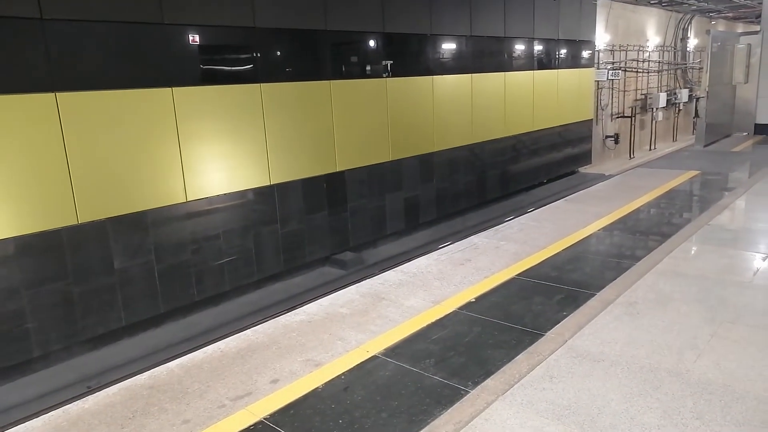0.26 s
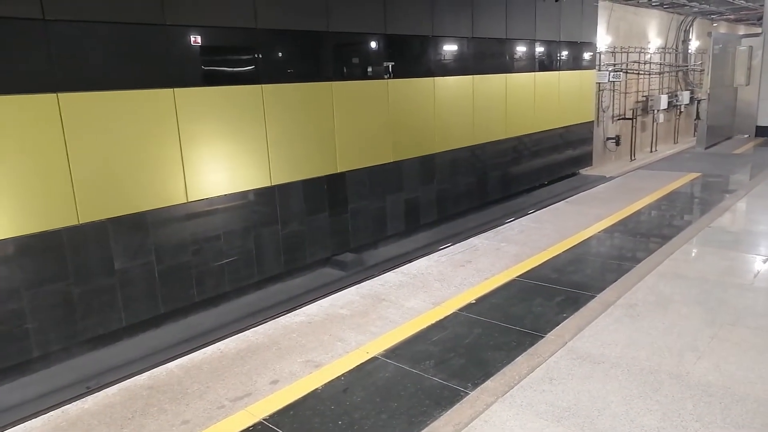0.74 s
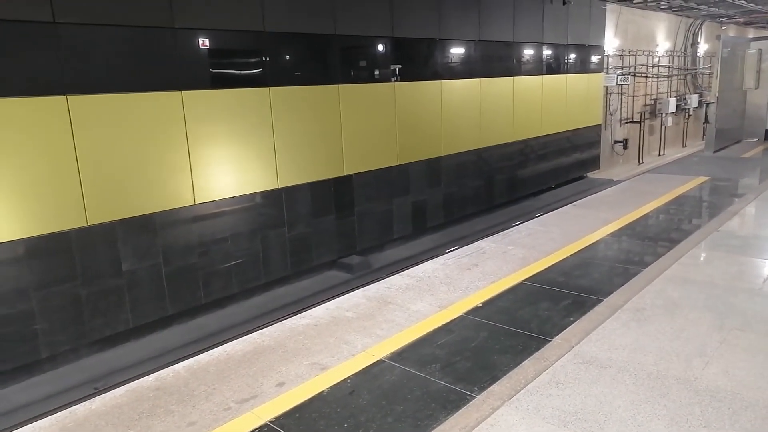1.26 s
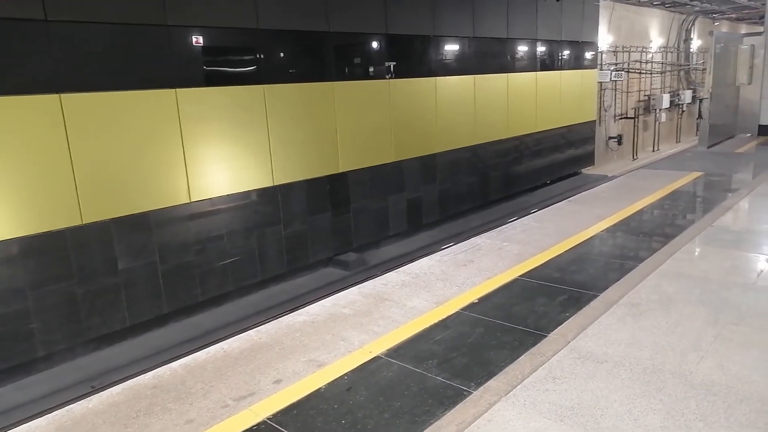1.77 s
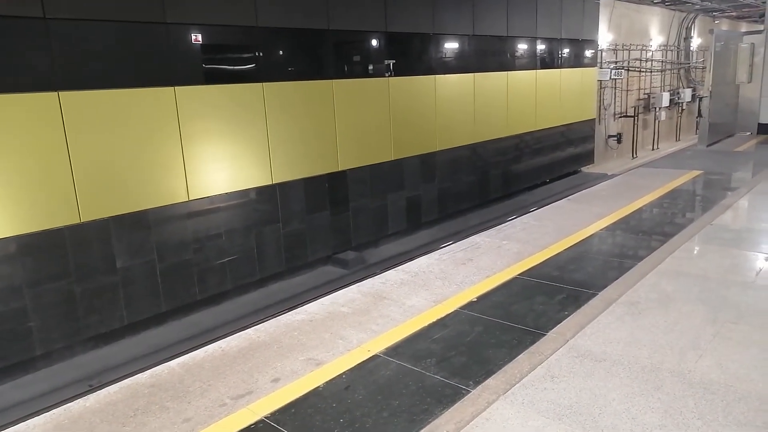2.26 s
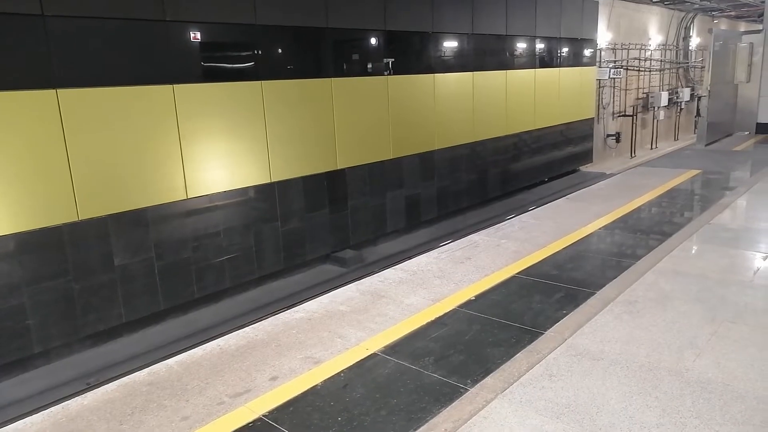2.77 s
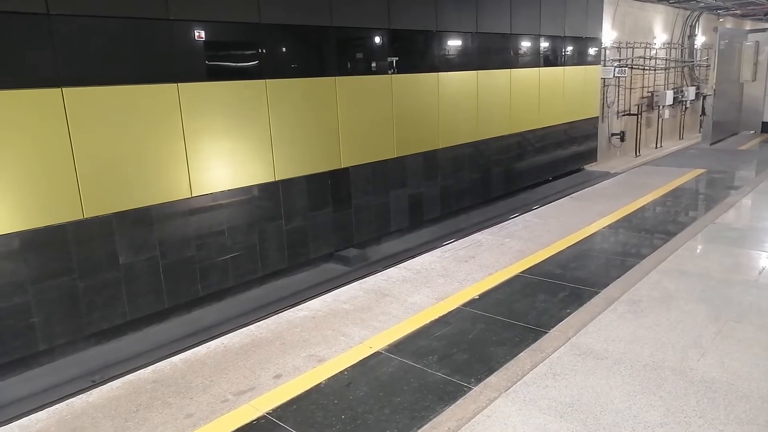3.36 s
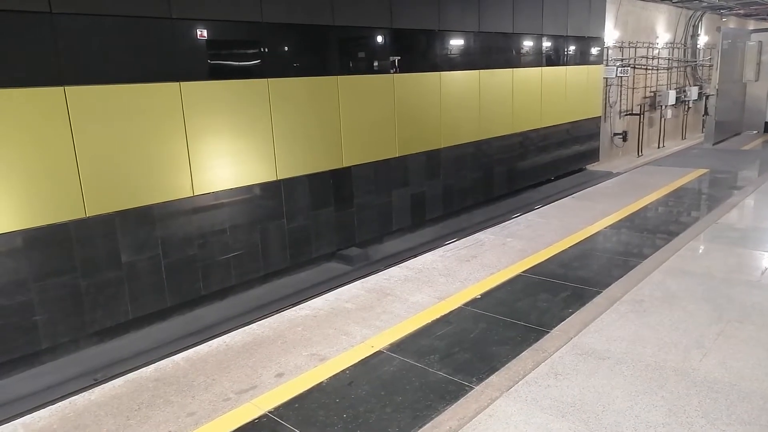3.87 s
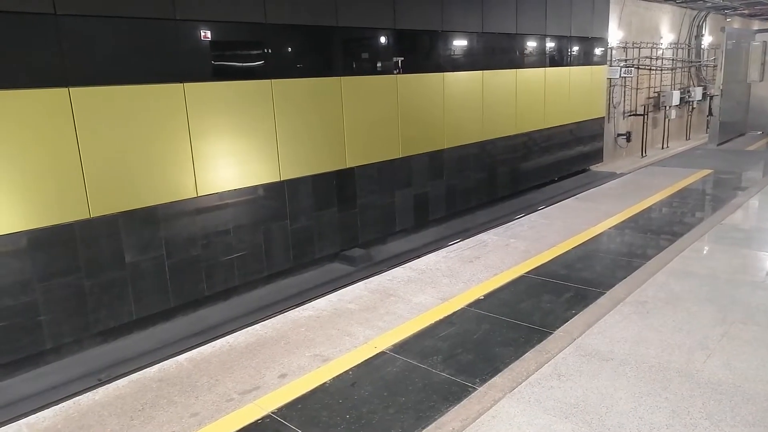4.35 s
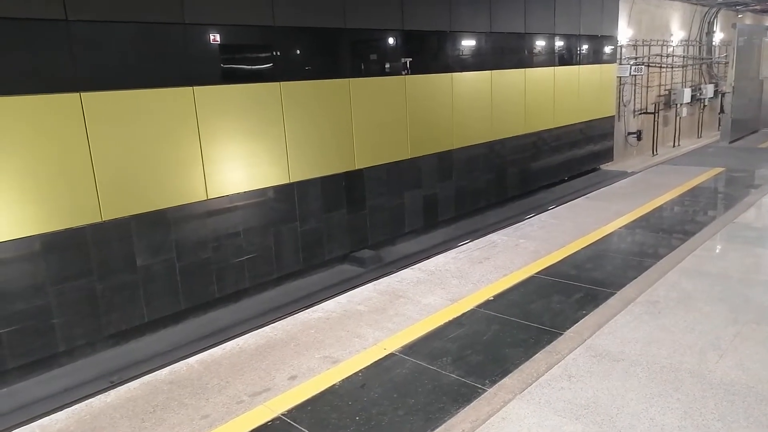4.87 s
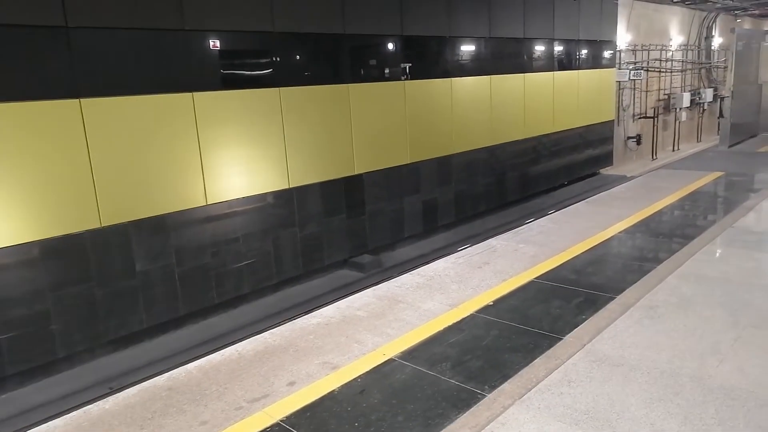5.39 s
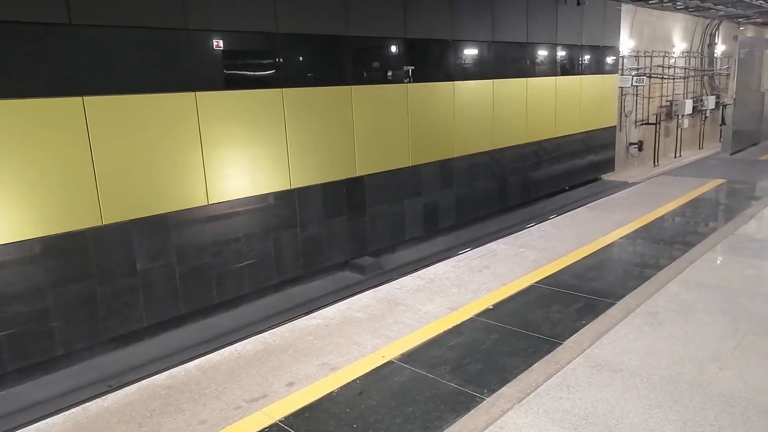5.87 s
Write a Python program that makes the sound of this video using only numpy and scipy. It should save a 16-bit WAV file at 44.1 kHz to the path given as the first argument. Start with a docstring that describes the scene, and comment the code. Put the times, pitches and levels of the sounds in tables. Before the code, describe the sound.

Empty metro platform, handheld stereo microphone. A far train fills the tunnel with a deep, uneven boom with brief hollow tones, and its soft wheel roar gradually grows. Draught thumps the microphone in short pops early on and again near the end. Quiet cloth rustles and tiny finger ticks sit close by, sharpest around three seconds, over a faint even hiss of moving air.

```python
"""An empty metro platform: a train still deep in the tunnel booms in the tube, whose standing waves swell
and sink, while its wheel roar slowly grows; all this is shaped noise, with a few drifting tones.
The draught that it pushes ahead thumps on the two microphone ports as short pops over a low flutter.
Close by, a sleeve rustles in strokes of grainy noise, and fingers tick and ring on the hand-held camera.
Behind it all, moving air hisses through the hall."""
import sys
import numpy as np
from scipy.fft import rfft, irfft, next_fast_len
from scipy.io import wavfile
from scipy.ndimage import uniform_filter1d, map_coordinates

SR = 44100
rng = np.random.default_rng(int(sys.argv[2]) if len(sys.argv) > 2 else 0)


def master_out(mix):
    """Clip the mix to full scale and print it as 16-bit PCM to the path in sys.argv[1]."""
    frames = np.transpose(np.atleast_2d(mix))
    ceiling = np.clip(frames, -1, 1)
    pcm = np.round(ceiling * 32767).astype(np.int16)
    wavfile.write(sys.argv[1], SR, pcm)


N = 270052

# Eddies that pop on the ports.
# Each row: time in seconds, relative level in dB, pitch in Hz, left over right in dB.
EDDY_POPS = [(0.534, -11, 170, -19), (.545, -20, 472, -26), (.553, -18.5, 465, -24),
             (.577, -21.5, 424, -27), (.585, -21, 468, -27), (.591, -27, 546, -29.5),
             (.670, -9.5, 202, -24), (.673, -21.5, 720, -31), (.678, -18, 500, -30), (.690, -23, 593, -24),
             (.695, -24.5, 343, -4), (.704, -24, 565, -27), (.715, -20.5, 477, -17.5),
             (.725, -16, 498, 17.5), (.738, -13.5, 390, 25.5), (.749, -24, 566, 20), (.774, -35, 546, 14.5),
             (1.099, -24.5, 470, 2), (1.107, -9, 160, 20.5), (1.121, -22.5, 428, 19),
             (1.136, -23, 476, -24), (1.169, -21, 420, 18), (1.194, -27, 517, -13.5), (1.201, -15, 503, 21),
             (1.214, -31, 557, 7), (1.234, -23.5, 577, 17), (1.254, -15.5, 138, -23.5),
             (1.279, -12.5, 85, 11), (1.347, -21, 128, 15), (5.801, -20.5, 830, 32), (5.804, -8, 560, 26),
             (5.811, -22, 580, 25), (5.824, -19, 69, 16), (5.828, -5.5, 187, 18), (5.886, -21, 400, 24),
             (5.928, -15, 150, 26), (5.933, -21.5, 583, 20.5), (5.946, -14, 218, 22), (5.959, -12, 276, 31),
             (6.079, -10, 244, 17), (6.082, -18.5, 553, 28), (6.084, -31, 1020, 29), (6.093, -22, 520, 26),
             (6.102, -26, 580, 24)]


def amp(db):
    """Decibels to gain."""
    return 10 ** (np.asarray(db) / 20)


def unit(x):
    """Scale to rms 1."""
    return x / np.sqrt(np.mean(x ** 2) + 1e-20)


def along(points, hz):
    """Read a curve of (Hz, value) points on a log frequency axis."""
    f, v = np.transpose(points)
    return np.interp(np.log(hz + 1), np.log(f + 1), v)


def clock():
    """The time of each sample in seconds."""
    return np.arange(N) / SR


def curves(rows):
    """One value per sample for each column after the time."""
    s, *cols = np.transpose(rows)
    return [np.interp(clock(), s, c) for c in cols]


def wobble(rate):
    """A smooth random curve with rate knots a second."""
    knots = rng.standard_normal(int(N * rate / SR) + 4)
    return map_coordinates(knots, [np.arange(N) * rate / SR])


def filtered(x, response):
    """x times a response of frequency."""
    m = next_fast_len(N + SR // 2)
    return irfft(rfft(x, m) * response(np.fft.rfftfreq(m, 1 / SR)), m)[..., :N]


def pan(lean_db):
    """Left and right gains of constant power; a positive lean is louder on the left."""
    pair = amp(np.array([lean_db, -lean_db]).reshape(2, -1) / 2)
    return pair / np.sqrt(np.mean(pair ** 2, axis=0))


def band(centre_hz, width_hz):
    """Noise of rms 1 in one resonance, whose centre may move."""
    slow = filtered(rng.standard_normal((2, N)), lambda hz: 1 / (1 + (hz / width_hz) ** 2))
    phase = 2 * np.pi * np.cumsum(centre_hz * np.ones(N)) / SR
    return unit(slow[0] * np.cos(phase) + slow[1] * np.sin(phase))


def ripple(hz, depth_db):
    """Uneven gain over frequency from many close reflections."""
    uneven = map_coordinates(rng.standard_normal(SR // 40), [hz / 35], order=1)
    return amp(depth_db * uneven * np.clip(hz / 1500, 0, 1))  # full depth above 1500 Hz


def stroke(s, length):
    """One swell: it builds to 1 at time s and dies away more slowly."""
    release_ratio, shape = 2.13, 1.4
    u = (clock() - s) / length
    return np.exp(-np.maximum(-u, u / release_ratio) ** shape)


def hall(colour, ripple_db=1.73):
    """Diffuse noise of rms 1: alike at both ports only for long waves, mostly stronger on the tunnel's side."""
    # The tunnel lies to the right. Each row: frequency in Hz, left over right in dB.
    side_lean = [(40, -2.5), (110, -0.5), (200, -6), (380, -2), (700, -3.5), (1300, -2.5), (2400, -5.5),
                 (4400, -13), (9000, 1)]
    port_gap_m, sound_speed_m_s = 0.18, 343

    def spread(hz):
        """Shares of mid and side that give the coherence of a diffuse field."""
        alike = 0.96 * np.sinc(2 * hz * port_gap_m / sound_speed_m_s)
        turn = np.arccos(np.clip(alike, -1, 1)) / 2
        return np.array([np.cos(turn), np.sin(turn)])

    mid, side = filtered(rng.standard_normal((2, N)), lambda hz: colour(hz) * spread(hz))
    both = np.array([mid + side, mid - side])
    return unit(filtered(both, lambda hz: pan(along(side_lean, hz)) * ripple(hz, ripple_db)))


def ports():
    """Contact noise of rms 1, coloured by each port's own resonances."""
    # Each row: frequency in Hz, relative level in dB (the right port is then set 4 dB lower).
    left_colour = [(1500, -22), (4200, -8), (5100, -4), (6200, -4.5), (7800, -4.5), (9100, 7.5),
                   (10700, -6), (13000, -12), (15000, -10.5), (16000, -17.5)]
    right_colour = [(1500, -15.5), (4000, -11.5), (5000, 9), (6600, 7.5), (8000, -4.5), (9200, -1.5),
                    (11000, -3), (13500, -0.5), (15000, 1.5), (16000, -8.5)]
    noise = rng.standard_normal((2, N))
    return unit(filtered(noise, lambda hz: amp([along(left_colour, hz), along(right_colour, hz) - 4])))


def train(tube_db=-5, unrest_db=1.3, growl_hz=350, growl_width_hz=32, thin_db=-7):
    """Rolling noise fills the tunnel and its standing waves; the wheels growl, and their roar grows as it nears."""
    # Colours of boom and roar. Each row: frequency in Hz, relative level in dB per Hz.
    boom_colour = [(15, -28.5), (28, -22), (36, -5.5), (55, -11.5), (110, -6.5), (170, -2.5), (225, -2.5),
                   (270, -3), (300, -5), (338, -11), (370, -37.5), (480, -39), (700, -82.5)]
    roar_colour = [(200, -13), (380, -1), (480, 0.5), (620, -2.5), (800, -6.5), (1000, -12), (1300, -20),
                   (2200, -42.5), (5000, -71)]
    # Standing waves of the tunnel. Each row: frequency in Hz, width in Hz, relative level in dB.
    standing_waves = [(38, 6.7, -7), (128.5, 3.9, -7.5), (147.7, 6.3, -10), (196.2, 12, -2.5),
                      (257.7, 14.3, -0.5), (463.6, 19, -21)]
    # Wheel growl just above the boom. Each row: time in seconds, level in dB.
    growl_course = [(0, -58.5), (3, -51.5), (3.6, -43), (4.2, -44.5), (4.65, -42), (5.25, -44), (5.7, -41),
                    (6.1, -57)]
    boom_level_db, roar_start_db, roar_db_per_s = -25, -45.5, 0.86
    thin_at_s, thin_length_s, thin_above_hz = 6.0, 0.093, 950

    t = clock()
    boom = hall(lambda hz: amp(along(boom_colour, hz)))
    tube = hall(lambda hz: sum(amp(db) / (1 + ((hz - c) / w) ** 2) for c, w, db in standing_waves))
    low = surging(amp(boom_level_db) * (boom + amp(tube_db) * tube) + swells())

    growl = hall(lambda hz: 1 / (1 + ((hz - growl_hz) / growl_width_hz) ** 2))
    growl = growl * amp(curves(growl_course)[0])

    roar_level_db = roar_start_db + roar_db_per_s * t + unrest_db * wobble(6.5)
    roar = amp(roar_level_db) * hall(lambda hz: amp(along(roar_colour, hz)))

    # the sound above about 950 Hz thins briefly near the end
    treble = filtered(roar, lambda hz: 1 - 1 / (1 + (hz / thin_above_hz) ** 8))
    thinning = amp(thin_db * np.exp(-((t - thin_at_s) / thin_length_s) ** 2))
    return low + growl + roar + (thinning - 1) * treble


def surging(boom):
    """Two bands of the boom are levelled, then swell and sink, each on its own course."""
    # Each row: time in seconds, level in dB about the band's mean.
    low_course = [(0.0, -3), (0.2, 4), (0.4, 4), (0.52, -11), (0.72, 3), (0.88, -2.5), (1.8, 0.5),
                  (2.0, -1), (2.44, 1.5), (3.24, -1), (4.52, -1), (4.88, 1), (5.04, 4), (5.24, 1),
                  (5.36, -0.5), (5.68, 1), (5.8, 5), (6.12, 0.5)]
    high_course = [(0.0, -1.5), (0.08, 1.5), (1.68, -1.5), (1.76, 0), (2.0, 1.5), (2.32, -1), (2.52, 1.5),
                   (3.36, 1.0), (3.52, -1), (3.68, 2), (3.96, 1.0), (4.12, 0.5), (4.36, 4), (4.84, -1),
                   (5.16, 2.5), (5.4, 0.5), (5.52, 3), (6.12, -0.5)]
    # Edges of the two bands in Hz, from low to high.
    edges = (163, 216.7, 315)
    out = boom
    for lo, hi, course in zip(edges, edges[1:], (low_course, high_course)):
        part = filtered(boom, lambda hz: 1 / (1 + (hz / hi) ** 30) - 1 / (1 + (hz / lo) ** 30))
        power = np.mean(part ** 2, axis=0)
        for _ in range(2):  # smoothed twice over 0.2 s
            power = uniform_filter1d(power, SR // 5)
        steady = part * np.sqrt(power.mean() / np.abs(power))
        out = out - part + steady * amp(curves(course)[0])
    return out


def swells(drift_hz=3, lean_db=-6):
    """Now and then a standing wave sings out: one nearly pure, drifting tone that rises and sinks back."""
    # Each row: time of the middle in seconds, length in seconds, pitch in Hz, level in dB before the surges.
    sung_tones = [(0.211, 0.055, 197, -23.5), (0.372, 0.047, 191, -24.5), (0.435, 0.049, 252, -26.5),
                  (1.798, 0.092, 231.8, -24.5), (2.047, 0.043, 271, -26), (2.179, 0.043, 229.6, -25),
                  (2.471, 0.12, 252.8, -29.5), (2.832, 0.056, 268.1, -26), (2.982, 0.053, 266.1, -26),
                  (3.158, 0.057, 266.3, -25.5), (3.685, 0.067, 252, -30.5), (3.99, 0.027, 266, -24.5),
                  (4.355, .08, 258.3, -28.5), (4.688, .07, 266.3, -22), (5.064, .06, 195.5, -21.5),
                  (5.128, 0.03, 245.3, -32), (5.553, .07, 269, -24), (5.825, .05, 197.3, -27.5),
                  (5.841, 0.062, 263.1, -25.5)]
    t, tones = clock(), np.zeros(N)
    drift = drift_hz * np.cumsum(wobble(8)) / SR  # in cycles
    for s, length, hz, db in sung_tones:
        swell = np.exp(-((t - s) / length) ** 2 / 2)
        tones += amp(db) * swell * np.sin(2 * np.pi * (hz * t + drift + rng.random()))
    return pan(lean_db) * np.sqrt(2) * tones


def draught(eddy_db=-3.0, cycles=0.91, swirl_db=-17, swirl_s=0.012, steep=5.7,
            trail_db=-9, trail_s=0.035, rough_db=3):
    """Each eddy is a pressure pop of a cycle or two, mostly on one port, in a brief swirl with a ragged trail."""
    out, t = np.zeros((2, N)), clock()
    length = SR // 4
    hz = np.fft.rfftfreq(length, 1 / SR)
    ragged = amp(rough_db * wobble(130))
    for s, db, pitch_hz, lean_db in EDDY_POPS:
        start = round(s * SR) - SR // 8
        span = slice(start, start + length)
        local = t[span] - s
        turns = local * pitch_hz
        pop = np.cos(2 * np.pi * (turns + rng.random())) / (1 + (turns / cycles) ** 2 / 2) ** 3
        # the swirl is noise around the pitch of the eddy
        colour = (hz / pitch_hz) / (1 + (hz / pitch_hz) ** steep)
        swirl = unit(irfft(rfft(rng.standard_normal(length)) * colour, length))[:len(local)]
        after = (1 + np.tanh(turns)) / 2
        trail = amp(trail_db) * after * np.exp(-np.abs(local) / trail_s) * ragged[span]
        swirl = amp(swirl_db) * swirl * (np.exp(-np.abs(local) / swirl_s) + trail)
        out[:, span] += amp(db + eddy_db) * pan(lean_db) * (pop + swirl)
    return out


def buffet(wake_db=-28.5, wake_s=0.049):
    """The draught keeps up a low flutter, unrelated at the two ports and harder around each eddy."""
    # Each row: frequency in Hz, relative level in dB per Hz.
    flutter_colour = [(15, -12.5), (40, 0.5), (80, 1.5), (140, -8.5), (300, -25.5), (800, -83.5)]
    # Steady flutter. Each row: time in seconds, level in dB.
    steady_course = [(0, -36), (.35, -44), (.52, -26), (.85, -34.5), (1.3, -25), (1.6, -31.5), (2, -39.5),
                     (4.3, -38), (4.6, -33.5), (5, -42.5), (5.3, -40.5), (5.6, -33.5), (5.95, -24.5),
                     (6.12, -28)]
    flutter = unit(filtered(rng.standard_normal((2, N)), lambda hz: amp(along(flutter_colour, hz))))
    power = amp(curves(steady_course)[0]) ** 2
    for s, db, _, lean_db in EDDY_POPS:
        power = power + (amp(db + wake_db) * pan(lean_db) * stroke(s, wake_s)) ** 2
    return np.sqrt(power) * flutter


def sleeve(grain_db=1.0, ripple_db=2, rest_db=-76.5, rest_lean_db=2, waver_db=1.5, catch_db=1.4):
    """Strokes rub the cloth in fine grains and stir a gliding hiss in the hollow of the hand, on the right."""
    # The hollow of the hand rings higher as the grip opens.
    # Each row: time in seconds, pitch in Hz, level in dB of its hiss between strokes.
    grip_course = [(0, 5320, -73.5), (1.8, 5640, -69), (1.93, 6240, -66), (3.6, 6496, -62.5),
                   (4.4, 6585, -62), (5, 6680, -64.5), (5.6, 6850, -67), (6.1, 7120, -72.5)]
    # Each row: time of the peak in seconds, length in seconds, rubbing level in dB, left over right in dB,
    # level of the hiss in the hollow in dB.
    rub_strokes = [(0.026, 0.08, -69.5, 0.5, -64.5), (0.473, 0.073, -83.5, -1, -64.5),
                   (0.88, 0.037, -80, -1, -64), (1.231, 0.038, -75, -3, -73), (1.947, 0.075, -71, 2.5, -58),
                   (2.357, 0.09, -67, -2, -65), (2.617, 0.045, -62.5, -1, -57),
                   (2.859, 0.076, -61, -2.5, -57), (3.101, 0.04, -55, 2.5, -51.5),
                   (3.259, 0.03, -61.5, 0, -58), (3.597, 0.098, -63, -4, -58),
                   (3.718, 0.037, -56, -6.5, -60.5), (3.841, 0.048, -57.5, -5, -64),
                   (4.08, 0.059, -57.5, 0, -60), (4.205, 0.053, -63.5, 0, -63),
                   (4.537, 0.037, -63.5, -1.5, -64.5), (4.696, 0.03, -67, 1.5, -59),
                   (4.905, 0.07, -56.5, 4, -65.5), (5.354, 0.027, -65.5, 1.5, -63),
                   (5.74, 0.042, -69.5, 3, -64), (6.115, 0.044, -72.5, -8, -64)]
    hollow_hz, idle_db = curves(grip_course)
    rub_power = (amp(rest_db) * pan(rest_lean_db)) ** 2  # the cloth never rests entirely
    hollow_power = amp(idle_db + waver_db * wobble(6.9)) ** 2
    for s, length, rub_db, lean_db, hollow_db in rub_strokes:
        swell = stroke(s, length)
        rub_power = rub_power + (amp(rub_db) * pan(lean_db) * swell) ** 2
        hollow_power = hollow_power + (amp(hollow_db) * swell) ** 2
    catch = catch_db * wobble(35)  # the cloth catches and slips
    rub = np.sqrt(rub_power) * amp(grain_db * wobble(300) + catch) * ports()
    hollow = np.sqrt(hollow_power) * amp(catch) * band(hollow_hz, width_hz=730)
    return filtered(rub + pan(lean_db=-27.0) * hollow, lambda hz: ripple(hz, ripple_db))


def fingers(snap_db=-2, snap_t60=0.012, snap_low_hz=5000, click_at_s=2.372, click_hz=1300, click_db=-8.0):
    """Each tick is a brief snap and a narrow ring of the case; one dry click is a dulled impulse on the right."""
    # Each row: time in seconds, level in dB, ring in Hz, width in Hz, time to fall 60 dB in seconds,
    # left over right in dB.
    finger_ticks = [(0.27, -56.5, 9300, 350, 0.33, 20), (0.301, -61.5, 6060, 613, 0.31, -14),
                    (.418, -62.5, 5600, 600, 0.25, -13), (.491, -57, 9250, 346, 0.096, 21),
                    (.521, -60, 9100, 350, 0.13, 20.5), (1.44, -63, 9000, 405, 0.13, 22),
                    (1.47, -62.5, 9050, 393, 0.2, 15.5), (1.619, -62.5, 9120, 400, 0.13, 13),
                    (1.649, -63, 9270, 400, 0.29, 15), (2.484, -61.5, 14540, 890, 0.091, -12),
                    (2.764, -57.5, 6880, 700, 0.027, -8), (3.038, -37.5, 6930, 700, 0.055, -15),
                    (3.043, -43.5, 9500, 870, 0.038, 14), (5.334, -59, 6670, 700, .03, -9.5),
                    (6.083, -66, 9260, 594, .3, 11)]
    t, out, click = clock(), np.zeros((2, N)), np.zeros(N)

    def decay(s, t60):
        """Sudden start at s, then a fall of 60 dB in each t60."""
        return (t >= s) * amp(-60 * np.minimum(np.abs(t - s) / t60, 3))

    contact = amp(snap_db) * filtered(ports(), lambda hz: 1 - 1 / (1 + (hz / snap_low_hz) ** 8))
    for s, db, hz, width, t60, lean_db in finger_ticks:
        tick = band(hz, width) * decay(s, t60) + contact * decay(s, snap_t60)
        out += amp(db) * pan(lean_db) * tick
    click[round(click_at_s * SR)] = amp(click_db)
    return out + pan(lean_db=-20.5) * filtered(click, lambda hz: 1 / (1 + 1j * hz / click_hz))


def rings(flutter_db=4.0):
    """Faint, thin metallic rings, narrow bands of noise, swell, flutter and fade on the right."""
    # Each row: time of the middle in seconds, length in seconds, pitch in Hz, width in Hz, level in dB.
    thin_rings = [(0.475, 0.061, 4660, 110, -64.5), (3.116, 0.031, 4960, 110, -51),
                  (3.215, 0.12, 4990, 130, -62), (3.73, 0.029, 3270, 50, -60),
                  (4.125, 0.047, 3170, 70, -64), (4.253, 0.059, 3210, 80, -63)]
    ring = np.zeros(N)
    for s, length, hz, width, db in thin_rings:
        ring += amp(db) * np.exp(-((clock() - s) / length) ** 2) * band(hz, width)
    return pan(lean_db=-18.0) * ring * amp(flutter_db * wobble(45))


def station(air_db=7, waver_db=0.9):
    """The even hiss of air moving through the hall; it wavers a little and sinks near the end."""
    # Each row: frequency in Hz, relative level in dB per Hz.
    vent_colour = [(600, -4.5), (1400, 2), (2000, -2), (2400, -0.5), (2800, -1.5), (3300, -3),
                   (3850, -11.5), (4300, -10.5), (5000, -7), (7000, -23.5), (15000, -30.5)]
    # Each row: time in seconds, relative level in dB, to which air_db is added.
    air_course = [(0.0, -60.5), (0.64, -65), (1.51, -65.5), (1.9, -62.5), (2.62, -65), (3.14, -62),
                  (3.41, -64.5), (3.74, -62), (4.18, -62.5), (4.35, -64), (4.91, -63), (5.61, -66),
                  (5.81, -69.5), (6.1, -69.5)]
    level_db = air_db + curves(air_course)[0] + waver_db * wobble(5.4)
    return amp(level_db) * hall(lambda hz: amp(along(vent_colour, hz)))


def scene():
    """The far train, its draught, the small sounds at the camera and the hall."""
    return train() + draught() + buffet() + sleeve() + fingers() + rings() + station()


def record(dry, top_hz=15760, fade_s=0.004):
    """The camera keeps nothing above its band limit; the sound starts and stops without a click."""
    soft_ends = np.clip(np.minimum(clock(), clock()[::-1]) / fade_s, 0, 1)
    return filtered(dry * soft_ends, lambda hz: hz < top_hz)


dry = scene()
out = record(dry)
master_out(out)
```